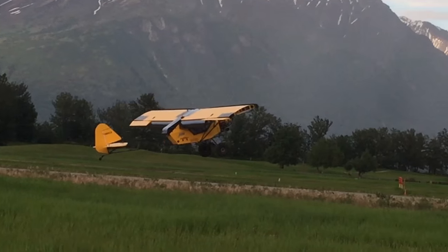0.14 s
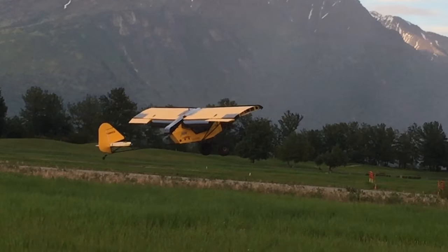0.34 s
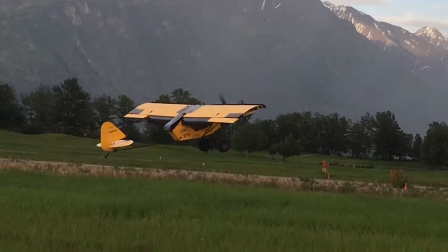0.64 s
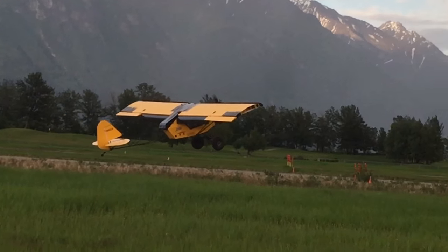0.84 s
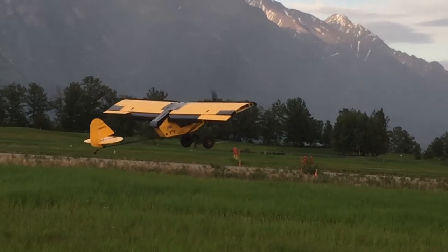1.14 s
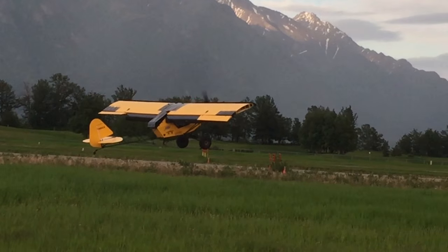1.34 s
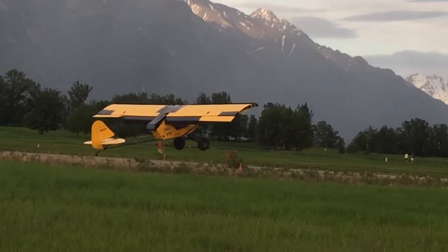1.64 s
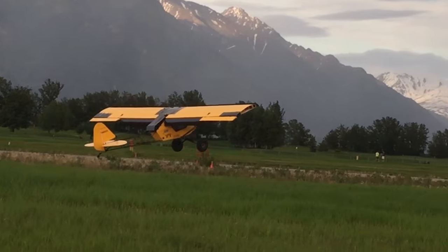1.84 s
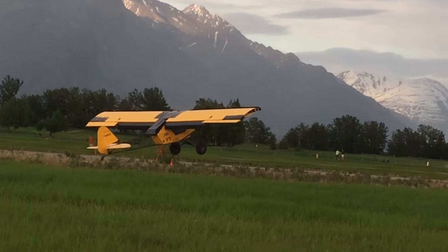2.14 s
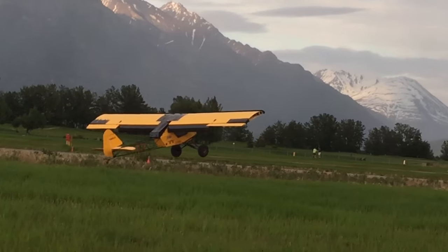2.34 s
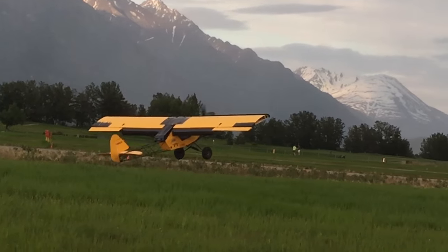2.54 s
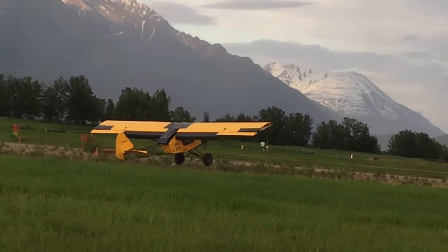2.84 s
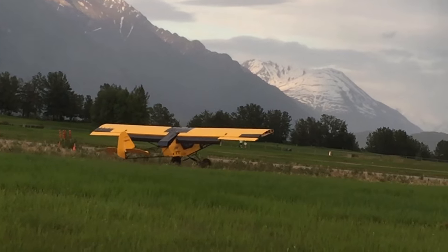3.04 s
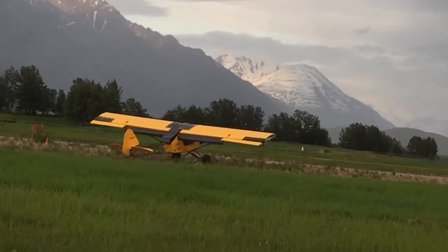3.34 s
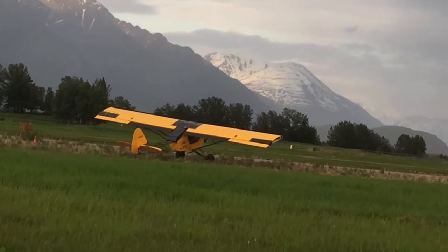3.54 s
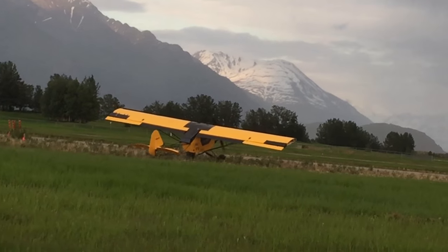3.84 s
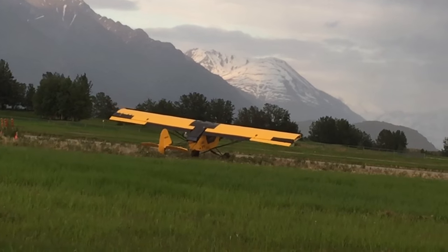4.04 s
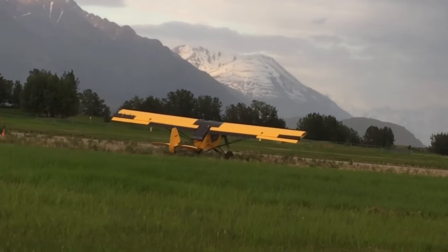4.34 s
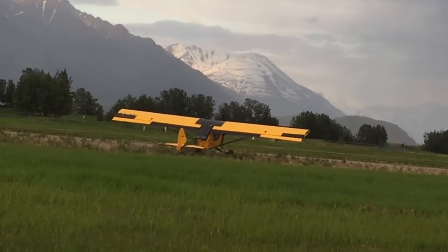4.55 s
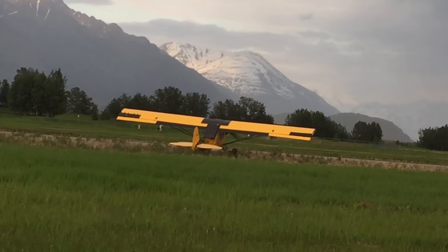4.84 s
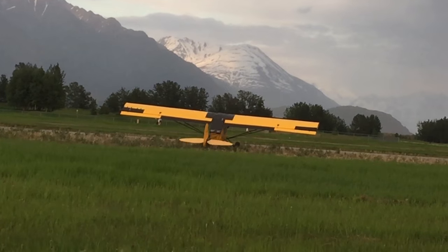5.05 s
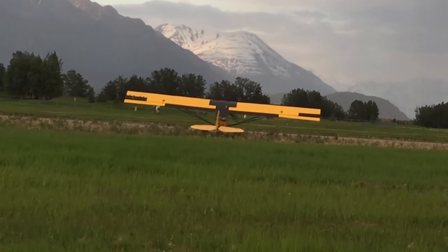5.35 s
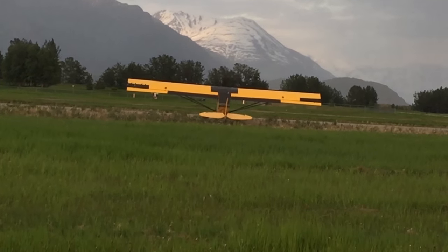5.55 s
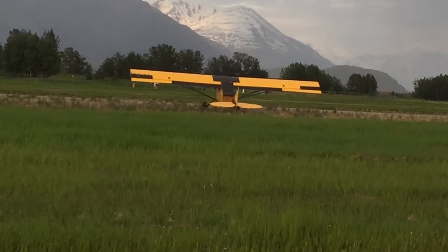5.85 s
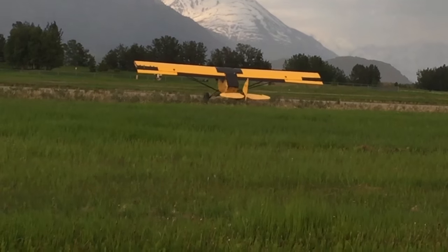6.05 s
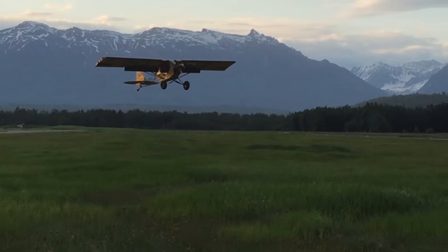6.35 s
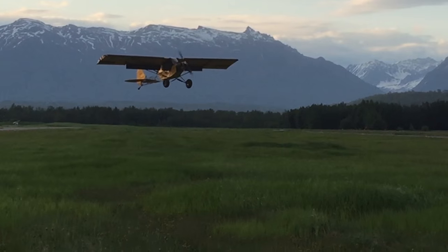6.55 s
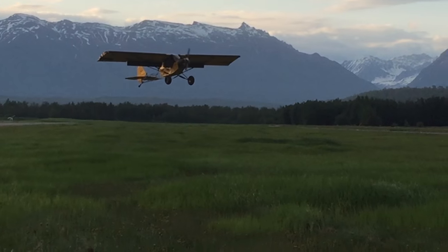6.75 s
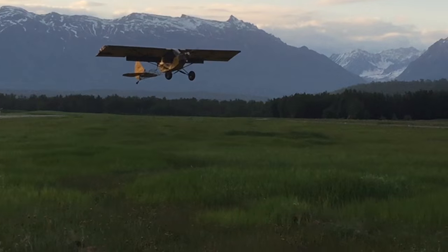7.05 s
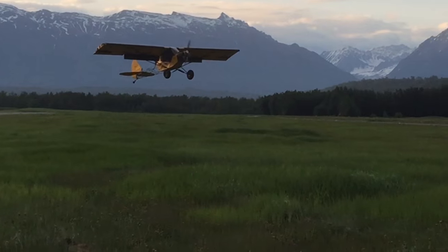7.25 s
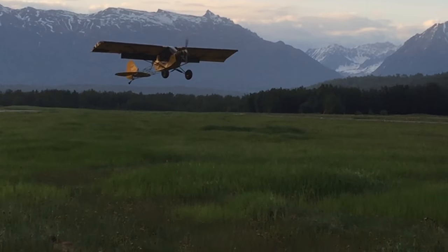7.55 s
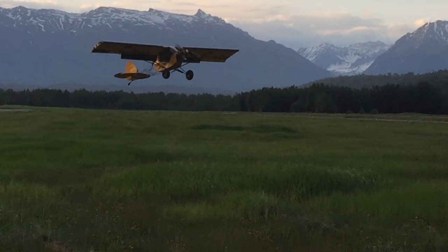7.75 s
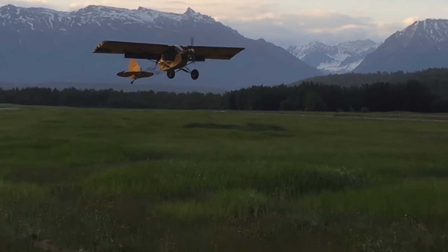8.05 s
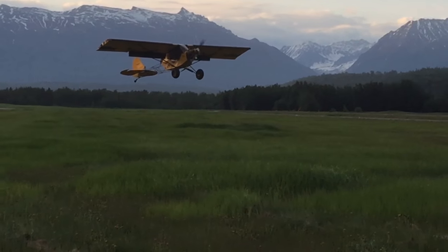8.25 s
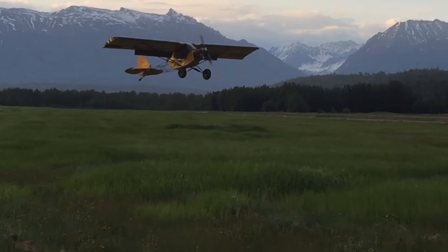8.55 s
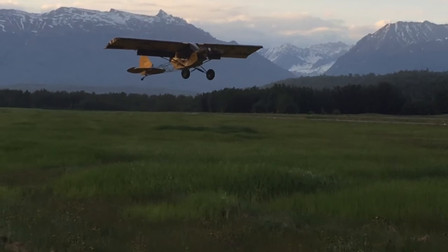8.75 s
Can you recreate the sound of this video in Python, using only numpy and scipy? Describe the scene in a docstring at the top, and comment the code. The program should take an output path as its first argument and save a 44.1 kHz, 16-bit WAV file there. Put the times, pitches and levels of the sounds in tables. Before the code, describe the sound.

Loud pulsing light-plane engine fades and drops to a slow chug with a soft grass swish, revs slightly, then cuts to a rising, whining approach.

```python
"""Flying past at its closest in buffeting wind, a light four-cylinder plane goes away as pulsed gas noise and drone.
It throttles back to idle, its exhaust orders sing down through the pipe, and it sinks and swishes onto the grass.
The throttle opens again; after an abrupt change of scene the plane comes in from the front with a whine.
It swells as the engine speeds up: exhaust tones, puffs and gas noise all follow the running count of firings."""
import sys
import numpy as np
from scipy import signal
from scipy.fft import rfft, irfft, next_fast_len
from scipy.io import wavfile
from scipy.ndimage import uniform_filter1d, map_coordinates

SR = 44100
rng = np.random.default_rng(int(sys.argv[2]) if len(sys.argv) > 2 else 0)


def int16_out(signal):
    """Quantize to a 16-bit WAV file."""
    q = np.round(np.clip(np.atleast_2d(signal).T, -1, 1) * 32767)
    wavfile.write(sys.argv[1], SR, q.astype(np.int16))


N = 392490
SCENE_CHANGE_S, BLEND_S = 6.216, .006


def from_db(db):
    """Amplitude ratio of a level in dB."""
    return 10 ** (np.asarray(db) / 20)


def rms_one(x):
    """Scale to rms 1."""
    return x / np.sqrt(np.mean(x ** 2) + 1e-20)


def seconds():
    """Time of each sample."""
    return np.arange(N) / SR


def in_time(rows):
    """Each column of a curve table, sample by sample."""
    s, *columns = np.transpose(rows)
    return [np.interp(seconds(), s, c) for c in columns]


def ramp(start_s, length_s):
    """Rises from 0 to 1."""
    return np.clip((seconds() - start_s) / length_s, 0, 1)


def coloured(x, spectrum):
    """Filter by a spectrum drawn on a log-frequency axis, falling away beyond its ends; rms 1."""
    hz, db = np.transpose(spectrum)
    size = next_fast_len(N + 8192)
    bins = np.maximum(np.fft.rfftfreq(size, 1 / SR), 1)
    skirt_db = -24 * np.abs(np.log2(bins / np.clip(bins, hz[0], hz[-1])))
    gain = from_db(np.interp(np.log(bins), np.log(hz), db) + skirt_db)
    return rms_one(irfft(rfft(x, size) * gain, size)[:N])


def noise(spectrum):
    """Coloured noise of rms 1."""
    return coloured(rng.standard_normal(N), spectrum)


def band(x, low_hz, high_hz, order=2):
    """Butterworth band-pass."""
    edges_hz = [low_hz, min(high_hz, .48 * SR)]
    return signal.sosfilt(signal.butter(order, edges_hz, "band", fs=SR, output="sos"), x)


def sliding(x, hz, width_hz):
    """A steep resonance whose centre moves; rms 1."""
    carrier = np.exp(2j * np.pi * np.cumsum(hz) / SR)
    low_pass = signal.butter(2, width_hz / 2, fs=SR, output="sos")
    return rms_one((signal.sosfilt(low_pass, x / carrier) * carrier).real)


def drift(rate):
    """Random curve of rms 1 through this many knots per second."""
    knots = rng.standard_normal(20000)
    return rms_one(np.interp(seconds() * rate, np.arange(len(knots)), knots))


def evened(x, window_s):
    """Divide by the running rms, which takes out slower swells."""
    return x / np.sqrt(uniform_filter1d(x ** 2, max(int(window_s * SR), 2)) + 1e-6)


def mixed(first, second, share):
    """Blend two sounds by power; the first has this share."""
    share = np.clip(share, 0, 1)
    return np.sqrt(share) * first + np.sqrt(1 - share) * second


def delayed(x, delay_s):
    """Delay by a fixed or moving time."""
    return map_coordinates(x, [np.arange(N) - delay_s * SR], order=1)


def coming_in():
    """True in the second scene."""
    return seconds() >= SCENE_CHANGE_S


def throttle_shut():
    """1 while the engine idles, 0 under power."""
    shut_s, shutting_s, open_s, opening_s = 3.03, 0.14, 4.84, 0.49
    return ramp(shut_s, shutting_s) - ramp(open_s, opening_s)


def flight_levels(speed):
    """Layer levels in dB from engine speed and distance (in doublings), and from being on the grass."""
    # Each entry: level at cruise speed and closest in dB, dB per doubling of speed,
    # dB per doubling of distance, dB added once on the grass. "chop" is a modulation depth.
    away_laws = {"chug": (-34, 6.5, 1.5, -3.5), "buzz": (-48, 17, -7, -4), "roar": (-38, 7.5, -4, -9.5),
                 "rasp": (-37.5, 15, -10, 0), "hiss": (-47, 12, -8.5, -2.5), "chop": (13, 14, -10, 12.5)}
    # Each entry: level at cruise speed in dB, dB per doubling of speed, dB added at the nearest.
    near_laws = {"chug": (-40.5, 3.6, 4.3), "buzz": (-50, 3.7, 0.85), "roar": (-44.5, 20.7, 6.9),
                 "rasp": (-37.5, 18.3, 2.3), "hiss": (-51, 14.7, 0.95), "chop": (3.75, 7.8, 0.96)}
    closest_s, crossing_s = 0.034, 1.435  # crossing: time to fly the closest distance
    nearest_s, nearing_s = 8.23, 0.42
    sink_s, sinking_s = 2.73, 0.73
    distance = np.log2(np.hypot(1, (seconds() - closest_s) / crossing_s))
    nearness = np.exp(-((seconds() - nearest_s) / nearing_s) ** 2)
    on_grass, near = ramp(sink_s, sinking_s), ramp(SCENE_CHANGE_S, BLEND_S)
    levels = {}
    for layer, (db, speed_db, distance_db, grass_db) in away_laws.items():
        near_db, near_speed_db, nearest_db = near_laws[layer]
        going = db + speed_db * speed + distance_db * distance + grass_db * on_grass
        coming = near_db + near_speed_db * speed + nearest_db * nearness
        levels[layer] = near * coming + (1 - near) * going
    return levels


def strengths(turns, uneven, spread_db):
    """Gain of the current firing: a four-cylinder pattern plus chance."""
    # Each entry: strength of one cylinder in dB, before scaling by uneven.
    cylinder_pattern = [7, 7.2, 3, 8]
    firing = turns.astype(int)
    chance = np.clip(rng.standard_normal(1024), -1.7, 1.7)
    return from_db(uneven * np.array(cylinder_pattern)[firing % 4] + spread_db * chance[firing])


def gas(turns, repeat_share):
    """Turbulence, part of which comes back alike on every revolution (two firings)."""
    pattern = rng.standard_normal(1600)
    place = turns / 2 % 1 * len(pattern)
    alike = rms_one(map_coordinates(pattern, [place], order=1, mode="nearest"))
    return mixed(alike, rng.standard_normal(N), repeat_share)


def slaps(turns, depth, decay, spread_db, repeat_share):
    """Each firing gives a short crack of uneven strength and turbulence that dies within the cycle."""
    # Short bursts of harder crackle. Each row: centre in seconds, gain in dB, length in seconds.
    crackle_bursts = [(.36,0,0.1),(0.835,6,0.027),(1.105,11,0.13),(7.12,9,.16),(7.4,1,.14),(7.748,11,0.16),(8.42,6,.2)]
    phase = turns % 1  # decay is in firing periods too
    burst = (1 - np.exp(-phase / 0.087)) * np.exp(-phase / decay)
    burst = burst * strengths(turns, uneven=0.47, spread_db=spread_db)
    crack = np.exp(-((phase - .12) / .045) ** 2) * strengths(turns, uneven=.3, spread_db=1.6)
    crackle_db = sum(db * np.exp(-((seconds() - s) / length) ** 2) for s, db, length in crackle_bursts)
    gate = 1 + depth * (1.23 * burst + 0.26 * from_db(crackle_db) * crack)
    gate = gate * from_db(2.07 * drift(1100))
    return gas(turns, repeat_share) * gate / np.sqrt(uniform_filter1d(gate ** 2, SR // 8))


def pipe_fundamental():
    """Exhaust pipe resonance in Hz; it sinks as the gas cools."""
    hot_hz, cool_hz, cooling_from_s, cooling_s = 308.8, 246, 2.08, 0.9
    cooling = np.exp(-np.maximum(seconds() - cooling_from_s, 0) / cooling_s)
    heat = np.where(coming_in(), 1, cooling)
    return cool_hz + (hot_hz - cool_hz) * heat


def drone(turns, firing_hz, waver_db):
    """The lowest orders are clean tones: the first is the propeller's blade rate, the others are exhaust
    orders; all are shaped by one response and are weak while the throttle is shut."""
    # Response of the low tones. Each row: frequency in Hz, level in dB.
    tone_response = [(35,-71),(49,-55.5),(54,-40),(65,-32),(78,-33),(95,-29),(108,-35.5),(135,-30),(162,-37.5),(195,-54)]
    # Each entry: multiple of the firing rate.
    orders = [1, 2, 2.25, 2.5, 3]
    # Each row, per order: dB going away, dB coming in, dB added with the throttle shut.
    order_levels = [(4, 4.5, -7), (0.55, -6, -10), (-20.5, -14.5, -9), (-13.5, -14, -23), (1, -2, -18.5)]
    shut = throttle_shut()
    hz, response_db = np.transpose(tone_response)
    out = 0
    for k, (away_db, near_db, shut_db) in zip(orders, order_levels):
        db = np.interp(np.log(k * firing_hz), np.log(hz), response_db)
        db = db + np.where(coming_in(), near_db, away_db) + shut_db * shut
        out = out - from_db(db + waver_db * drift(13)) * np.sin(2 * np.pi * k * (turns - .19))
    return np.sqrt(2) * signal.sosfilt(signal.butter(3, 900, fs=SR, output="sos"), out)


def exhaust(turns, levels):
    """One puff per firing: unequal puffs chug in the muffler, their sharp edges buzz."""
    # Spectra. Each row: frequency in Hz, relative density in dB per Hz.
    chug_colour, buzz_colour = [(25,-35),(45,2),(60,8),(90,8),(140,1),(190,-13),(260,-48),(500,-72)], [(160,-34),(220,-10),(320,-1.5),(430,-22.5),(600,-25.5),(780,-10),(920,-10),(1500,-5.5),(3000,-38)]
    idle_chug_db = 1.5  # added with the throttle shut
    puffs = np.diff(np.floor(turns), prepend=0)
    jittered = np.maximum.accumulate(turns + 0.076 * drift(40))
    ragged = np.diff(np.floor(jittered), prepend=0)
    unequal = ragged * (strengths(turns, uneven=2.3, spread_db=8.5) - .8)
    chug = coloured(unequal, chug_colour) + .5 * noise(chug_colour)
    buzz = coloured(puffs * strengths(turns, uneven=0.56, spread_db=6.5), buzz_colour)
    chug_gain = from_db(levels["chug"] + idle_chug_db * throttle_shut())
    return chug_gain * evened(chug, window_s=0.081) + from_db(levels["buzz"]) * buzz


def growl(turns, half_db, quarter_db):
    """Gas flow repeating every four firings: whole orders, weaker half and quarter orders between."""
    k = np.arange(1, 4 * 48)
    db = np.where(k % 4 == 0, 0, np.where(k % 2 == 0, half_db, quarter_db))
    partials = from_db(db) * np.exp(2j * np.pi * rng.random(len(k)))
    cycle = irfft(np.r_[0, partials], 4096)
    return np.interp(turns / 4 % 1, np.linspace(0, 1, len(cycle) + 1), np.r_[cycle, cycle[0]])


def pipe(x, reflection):
    """Sound runs up and down the exhaust pipe, which rings at multiples of its fundamental."""
    pipe_hz = pipe_fundamental()
    return x + sum(reflection ** k * delayed(x, k / pipe_hz) for k in range(1, 4))


def glancing(x, strength, longest_s):
    """Reflections off ground and airframe come and go by chance and mottle the treble."""
    delays = rng.uniform(0.1602, 1, size=5) * longest_s
    echoes = sum(np.tanh(drift(14)) * delayed(x, d + .00004 * drift(5)) for d in delays)
    return x + strength * echoes


def wash(turns, levels, colour, decay, roar_share, rasp_share, reflection):
    """Pulsing gas noise: the roar rings in the pipe; the higher the band, the harder it is chopped."""
    # Treble that flares and fades. Each row: time in seconds, level in dB.
    treble = [(.2,-2),(.4,2.5),(.68,-3.5),(1.12,7),(1.4,0.5),(2.05,5.5),(2.3,-1.5),(3.2,-6),(5.1,-0.5),(6.22,-5.5),(6.52,1),(6.8,-2),(7.05,10),(7.3,-1.5),(8,1),(8.5,8)]
    rasp_flare_share, chop_flare_share, sizzle_flare_share = 0.31, 0.19, 0.23
    sizzle_db, growl_share = -19.5, .6  # relative to the hiss; share of the roar's power under power
    flare_db, = in_time(treble)
    depth = from_db(levels["chop"] + chop_flare_share * flare_db)
    roar_db = levels["roar"]
    rasp_db = levels["rasp"] + rasp_flare_share * flare_db
    hiss_db = levels["hiss"] + flare_db
    sizzle_db = hiss_db + sizzle_db + sizzle_flare_share * flare_db
    turbulent = slaps(turns, depth * roar_share, decay, spread_db=7.5, repeat_share=0)
    repeating = growl(turns, half_db=-4.0, quarter_db=-8.0)
    turbulent, repeating = (rms_one(band(x, 150, 1400)) for x in (turbulent, repeating))
    share = growl_share * (1 - throttle_shut())  # at idle only uneven puffs are left
    roar = pipe(mixed(repeating, turbulent, share), reflection)
    rasp = slaps(turns, depth * rasp_share, decay, spread_db=-0.1, repeat_share=0.16)
    rasp = glancing(rasp, strength=0.27, longest_s=0.003994)
    hiss = slaps(turns, depth, decay * 0.82, spread_db=3.0, repeat_share=0.06)
    hiss = glancing(hiss, strength=0.43, longest_s=0.00216)
    layers = [(roar, roar_db, 200, 1100), (rasp, rasp_db, 1100, 4800),
              (hiss, hiss_db, 4800, 10000), (hiss, sizzle_db, 10000, 18000)]
    out = 0
    for x, db, low_hz, high_hz in layers:
        layer = coloured(band(x, low_hz, high_hz, order=5), colour)
        out = out + from_db(db) * evened(layer, window_s=0.11)
    return out


def pipe_ring(turns):
    """Going away, the puffs excite two resonances of the pipe, which slide down with its fundamental."""
    # Each row: time in seconds, level in dB.
    ring_track = [(0,-48),(.45,-48),(1.3,-46),(2.2,-45),(2.7,-49.5),(3.15,-53),(3.5,-58.5),(3.9,-57),(4.4,-74),(5.1,-61),(6.2,-68.5)]
    # Each row: multiple of the fundamental, width in Hz, relative level in dB.
    ring_modes = [(2, 87, 1.5), (5.3, 260, -8.5)]
    db, = in_time(ring_track)
    puffs = slaps(turns, depth=2.5, decay=0.22, spread_db=5.5, repeat_share=0.73)
    pipe_hz = pipe_fundamental()
    ring = 0
    for k, width_hz, mode_db in ring_modes:
        ring = ring + from_db(mode_db) * evened(sliding(puffs, k * pipe_hz, width_hz), window_s=.2)
    return from_db(db) * ring * ~coming_in()


def wind():
    """Eddies hit the microphone: the rumble of a gust, and single buffets with a thud and a flutter."""
    # Strong buffets. Each row: start in seconds, strength in dB, length in seconds.
    strong = [(0.012,-5.5,0.014),(0.032,2.5,0.0086),(0.063,-7.5,0.011),(0.089,-15.5,0.019),(0.271,-13,0.01),(0.293,-6.5,0.011),(0.342,-19,0.016),(0.381,-7,0.0094),(0.411,-10,.02),(0.439,-12,.014),(0.487,-8,0.01),
              (0.54,-11,0.023),(0.616,-5.5,0.0061),(0.637,-2,0.0088),(0.664,-4,0.011),(0.754,-11,0.012),(0.798,-13.5,0.024),(0.86,-16.5,0.025),(0.934,-9,0.017),(0.967,-20,.016),(1.006,-14,0.011),(1.104,-9,0.017),
              (1.471,-20,0.037),(1.618,-21.5,0.084),(2.725,-14.5,0.017),(3.336,-34,0.014),(3.549,-34,0.027),(3.954,-36,0.011),(4.388,-36,0.048),(4.513,-34.5,0.039),(4.561,-42,0.027),(5.326,-26,0.016),(5.892,-40,0.022),
              (6.649,-21.5,0.029),(6.692,-21.5,0.042),(7.014,-26,0.036),(7.068,-27,0.07),(7.65,-31,0.032),(7.723,-24,0.027),(7.769,-27,0.019),(8.466,-20.5,0.036),(8.547,-14.5,0.027),(8.608,-25,0.027)]
    # Spectra. Each row: frequency in Hz, relative density in dB per Hz.
    thud_colour, flutter_colour = [(27,-39),(50,-2.5),(80,5),(140,-1.5),(210,-17.5),(400,-48),(1000,-93)], [(80,-42),(170,4.5),(230,-4.5),(330,-12),(480,-23.5),(1200,-30),(3000,-72)]
    wind_colour = [(25,-42),(48,-21),(85,4),(160,-2),(250,-7.5),(400,-16.5),(800,-58),(2000,-68)]
    weak_db, weak_s = -47.5, 0.14
    thud_db, thud_growth_db_per_db, flutter_db = -10.5, 0.57, -7.5
    gust_s, gust_rise_s, gust_db, gust_fade_db_per_s, breeze_db = 0.14, 0.18, -22, 17, -68.5
    thud, flutter = np.zeros(N + SR), np.zeros(N + SR)
    t = np.arange(SR // 2) / SR
    weak = [(s, weak_db, weak_s) for s in rng.random(size=10) * N / SR]  # at random times
    for s, db, length in strong + weak:
        shape = (1 - np.exp(-t / 0.0026)) * np.exp(-(t / max(length, .005)) ** 1.2)
        thud[int(s * SR):][:len(t)] += from_db(thud_db + thud_growth_db_per_db * db) * shape
        flutter[int(s * SR):][:len(t)] += from_db(flutter_db + db) * shape
    buffets = thud[:N] * evened(noise(thud_colour), window_s=0.0092)
    buffets = buffets + flutter[:N] * evened(noise(flutter_colour), window_s=0.0205)
    fade_db = gust_fade_db_per_s * (seconds() - gust_s - gust_rise_s)
    gust = ramp(gust_s, gust_rise_s) ** 2 * from_db(gust_db - fade_db)
    swell = (gust + from_db(breeze_db)) * from_db(0.7 * drift(25))
    rumble = swell * evened(noise(wind_colour), window_s=0.21)
    return band(buffets, 25.4, 3000, order=3) + rumble


def air():
    """Steady, faint background noise."""
    # Each row: frequency in Hz, relative density in dB per Hz.
    air_colour = [(25,1),(60,2.5),(300,-36),(480,-21),(1000,-1),(2000,-30),(5000,-23.5),(9000,-23),(11000,-25),(16000,-26)]
    return from_db(-69) * noise(air_colour)


def rattles():
    """Short cracks and chirps of the plane: decaying noise, each around its own pitch."""
    # Each row: start in seconds, peak in dB, pitch in Hz, decay in seconds, width in octaves.
    cracks = [(0.072,-32.5,7900,0.0017,0.42),(.393,-21,4260,0.0022,1.5),(1.578,-30.5,7400,0.0014,0.1),(2.207,-27,2790,0.0013,0.41),(2.227,-26.5,2360,0.0012,1.4),(3.153,-53,6100,.008,.1),
              (3.737,-45,2980,0.011,1.8),(3.805,-45.5,1500,0.0047,0.82),(3.952,-54,700,.004,1),(5.045,-53,6500,.006,.15),(5.081,-49,6250,0.0087,.08),(5.146,-49,6500,.008,.1),(5.152,-46,2800,0.0087,0.71),
              (5.21,-51,6400,.005,.05),(5.235,-58,3680,0.0065,.1),(5.273,-53,3220,.006,.1),(5.9937,-44.5,1280,0.0056,0.46),(6.303,-27,1540,0.0045,0.17),(8.022,-17,1660,0.0017,0.61),(8.597,-13,1685,0.0014,.9)]
    out, t = np.zeros(N + SR), np.arange(SR // 10) / SR
    for s, db, hz, decay, octaves in cracks:
        width = 2 ** (max(octaves, .02) / 2)
        crack = rng.standard_normal(len(t)) * np.exp(-t / decay)
        crack = band(crack, hz / width, hz * width, order=1)
        crack = band(crack, hz / 3, hz * 2, order=3)
        out[int(s * SR):][:len(t)] += from_db(db) * crack / np.abs(crack).max()
    return out[:N]


def bite(turns):
    """Swells of a hard edge in the gas noise: a snap and a spit per firing, blended with an even rush."""
    # Each row: centre in seconds, level in dB, length in seconds, pitch in Hz,
    # share of the power that pulses with the firings.
    swells = [(0.372,-38,0.18,3100,0.86),(.72,-47,.2,2600,0.62),(5.36,-67,0.37,3500,0.16),(6.08,-65,0.17,4000,.3),(7.32,-46,.2,2770,1),(7.78,-38,.07,3000,1),(8.484,-32,0.15,2880,0.81)]
    width_ratio, snap_share = 1.42, 0.11
    snaps = np.diff(np.floor(turns - .12), prepend=0) * strengths(turns, uneven=.25, spread_db=2.0)
    spit = slaps(turns, depth=6.2, decay=0.13, spread_db=5.0, repeat_share=0.16)
    edge, rush = mixed(rms_one(snaps), spit, snap_share), rng.standard_normal(N)
    out = 0
    for s, db, length, hz, pulsed in swells:
        sound = band(mixed(edge, rush, pulsed), hz / width_ratio, hz * width_ratio, order=3)
        out = out + from_db(db) * np.exp(-((seconds() - s) / length) ** 2) * rms_one(sound)
    return out


def pipe_tones(turns, waver_db):
    """As the departing engine slows, a few orders glide down through the pipe's resonance and sing."""
    # Each row: multiple of the firing rate, relative level in dB.
    sing_orders = [(10.5, -4), (11.25, -3), (12, 0), (12.5, -4)]
    peak_s, length_s, sing_db = 2.35, .55, -53
    swell = from_db(sing_db) * np.exp(-((seconds() - peak_s) / length_s) ** 2)
    tones = 0
    for k, db in sing_orders:
        tone = np.sin(2 * np.pi * (k * turns + rng.random()))
        tones = tones + from_db(db + waver_db * drift(7.97)) * tone
    return np.sqrt(2) * swell * tones


def squeak(turns):
    """A fuzzy, many-stranded chirp on each revolution, answered by a weaker one half a turn later."""
    # Each row: time in seconds, pitch in Hz, level in dB, pitch ratio of the answer, its relative dB.
    chirp_track = [(2.9,16500,-92,1,-14),(3.25,14600,-71,1,-14),(3.55,12700,-76,1,-14),(3.95,10100,-67,1.02,-14),(4.75,8750,-65,1.04,-13),(5.02,9500,-66,1.06,-12),(5.3,11600,-77,1.1,-5),(5.6,12300,-78,1.11,-3),(6.15,12700,-75,1.1,-2),(6.25,12200,-78,1,-4),(6.4,12000,-69,1,-4),(6.9,12000,-60,1,-4),(7.3,11800,-92,1,-6)]
    # Each row: pitch ratio, relative level in dB.
    strand_table = [(.955, -8), (1, -1), (1.05, -7)]
    waver_db = 2.2
    hz, db, answer_ratio, answer_db = in_time(chirp_track)
    phase = turns % 1 - .5
    first_half = turns % 2 < 1
    pitch_hz = hz * np.where(first_half, 1 - 0.028 * phase, answer_ratio)
    angle = 2 * np.pi * np.cumsum(pitch_hz) / SR
    chirps = np.where(first_half, 1, from_db(answer_db)) * np.exp(-((phase + .08) / 0.3) ** 2)
    strands = 0
    for ratio, strand_db in strand_table:
        strands = strands + from_db(strand_db) * drift(900) * np.sin(ratio * angle)
    return from_db(db + waver_db * drift(15)) * chirps * strands


def tyres():
    """The wheels swish as they meet the grass and brush it while the plane rolls."""
    # Each row: frequency in Hz, relative density in dB per Hz.
    tyre_colour = [(600,-41),(950,12),(1250,8),(1700,-10),(3500,-40),(8000,-38)]
    touchdown_s, swish_s, swish_db, roll_db = 3.13, 0.19, -50.5, -71.5
    t = seconds()
    swish = from_db(swish_db) * np.exp(-((t - touchdown_s) / swish_s) ** 2)
    rolling = from_db(roll_db + 5.6 * drift(30)) * ((t > touchdown_s) & ~coming_in())
    return (swish + rolling) * noise(tyre_colour)


def whine(turns, speed):
    """Coming in, clean middle orders stand out; pitch and level rise with engine speed."""
    # Each entry: multiple of the firing rate.
    whine_orders = [4, 5, 6, 7, 8, 12]
    # Each entry: level of that order at cruise speed in dB.
    whine_levels = [-61.5, -70.5, -55, -57, -60.5, -65]
    rise_db_per_doubling, waver_db = 9, 1.2
    tones = 0
    for k, db in zip(whine_orders, whine_levels):
        tone = np.sin(2 * np.pi * (k * turns + rng.random()))
        tones = tones + from_db(db + waver_db * drift(9)) * tone
    return np.sqrt(2) * coming_in() * from_db(rise_db_per_doubling * speed) * tones


def scene():
    """The firing count drives every engine layer; wind and air are added."""
    # Engine speed. Each row: time in seconds, firings per second.
    away_engine, near_engine = [(0.0, 52.4), (0.55, 53.4), (0.9, 54.65), (1.95, 52.92), (2.32, 48.25),
                                (3.06, 43.08), (3.25, 36.61), (3.94, 27.35), (4.7, 24.82), (4.92, 26.78),
                                (5.3, 34.08), (5.59, 38.82), (6.2, 41.68)], [(6.216, 48.49), (6.91, 49.11), (7.05, 49.96),
                                                     (7.5, 52.08), (7.8, 53.65), (8.03, 57.52),
                                                     (8.29, 63.18), (8.63, 66.4), (8.9, 60.7)]
    # Gas noise. Each row: frequency in Hz, relative density in dB per Hz.
    away_colour, near_colour = [(220,-20),(320,-16),(400,-8),(480,-1.5),(600,1),(750,-8),(890,0),(1150,-6.5),(1500,-1.5),(2300,-6),(2800,-6),(3800,-11),(4450,-13),(4950,-16.5),(5500,-12.5),(6300,-12),(9300,-23),(10600,-31.5),(14500,-38.5)], [(250,-19),(330,-14.5),(460,-0.5),(610,2.5),(750,-1.5),(920,2),(1500,0.5),(2000,-3),(2500,-5.5),(3800,-6.5),(4350,-9.5),(4950,-18),(5700,-11),(8300,-22),(10300,-35),(11500,-35),(14000,-54.5)]
    cruise_hz = 50
    near = coming_in()
    firing_hz = np.where(near, *in_time(near_engine), *in_time(away_engine))
    turns = .25 + np.cumsum(firing_hz) / SR  # counts firings
    turns = turns + near * (-turns[near][0] % 1)  # the second scene opens on a firing
    speed = np.log2(firing_hz / cruise_hz)
    levels = flight_levels(speed)
    going = wash(turns, levels, away_colour, decay=0.19, roar_share=0.19, rasp_share=0.57, reflection=0.097)
    coming = wash(turns, levels, near_colour, decay=0.2, roar_share=0.016, rasp_share=0.72, reflection=0.35)
    blend = ramp(SCENE_CHANGE_S, BLEND_S)
    plane = drone(turns, firing_hz, waver_db=1.0) + exhaust(turns, levels)
    plane = plane + blend * coming + (1 - blend) * going
    plane = plane + pipe_ring(turns) + rattles() + bite(turns) + pipe_tones(turns, waver_db=4.0)
    plane = plane + squeak(turns) + tyres() + whine(turns, speed)
    return (plane + wind() + air())[None]


def record(dry):
    """Steep low-pass, 80 dB down from 17.8 kHz upward."""
    return signal.sosfilt(signal.cheby2(16, 80, 17800, fs=SR, output="sos"), dry)


dry = scene()
out = record(dry)
int16_out(out)
```